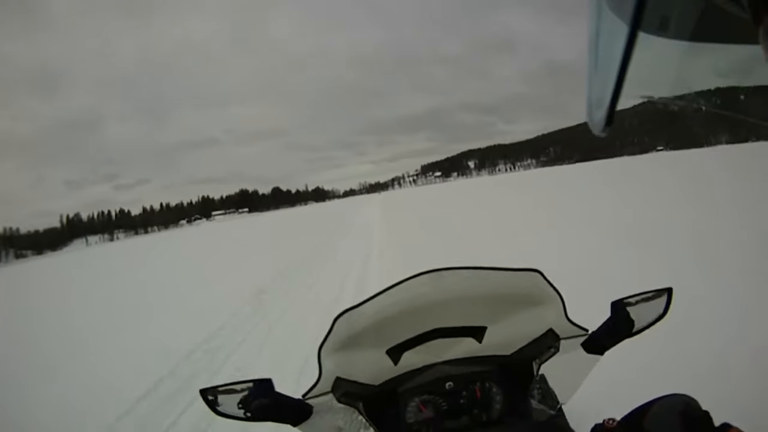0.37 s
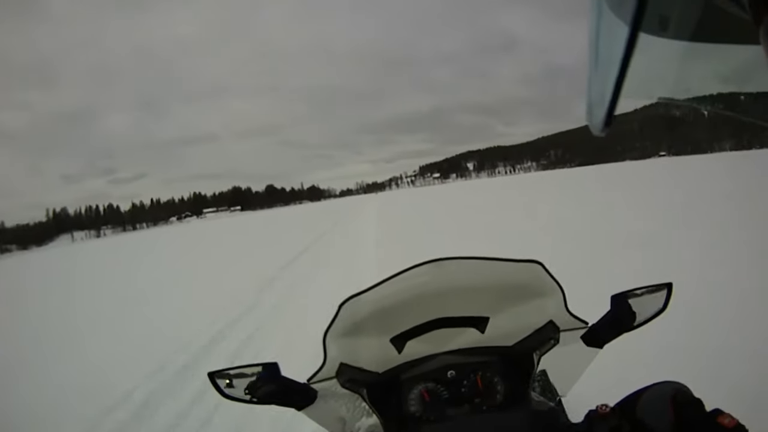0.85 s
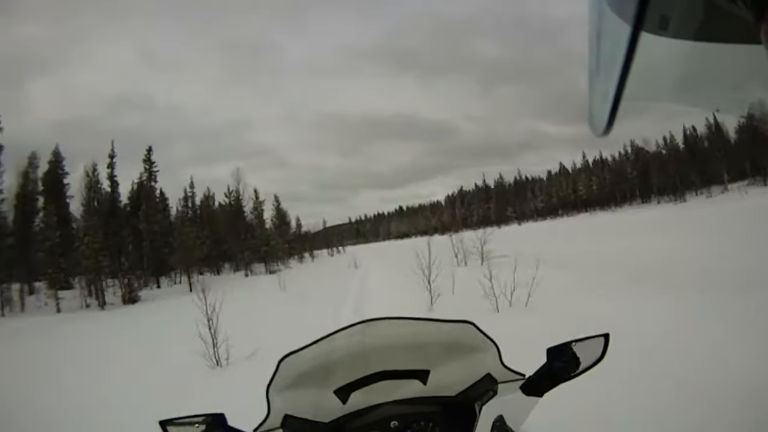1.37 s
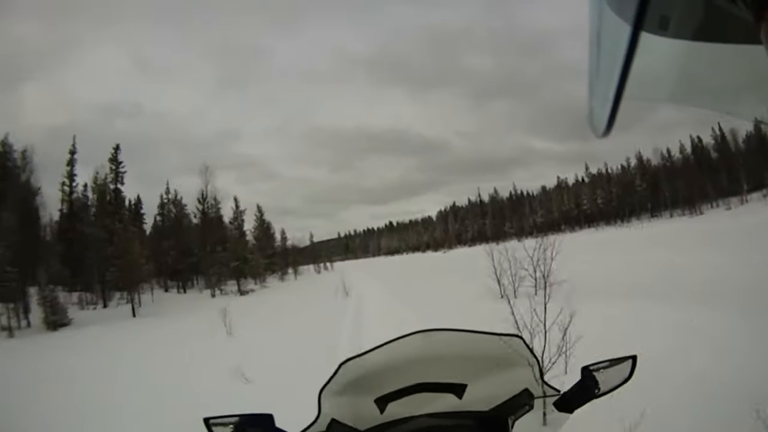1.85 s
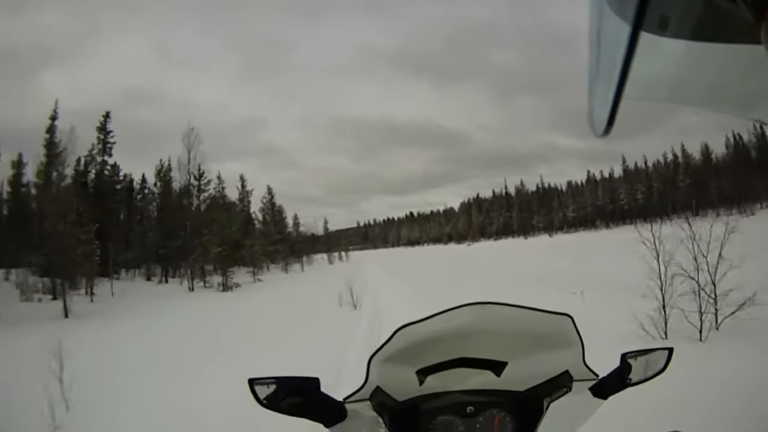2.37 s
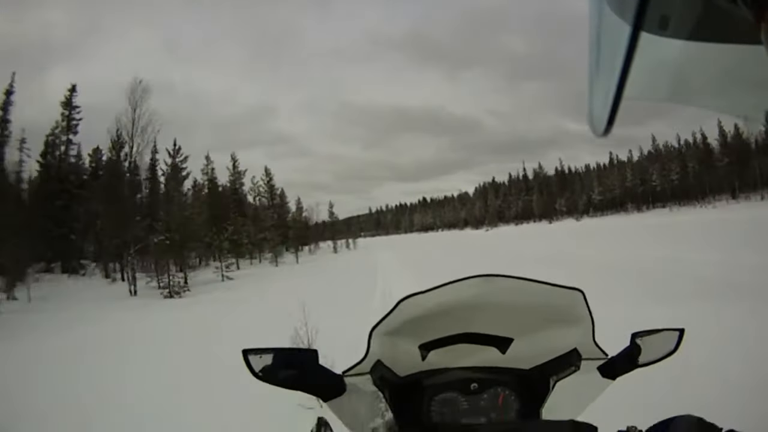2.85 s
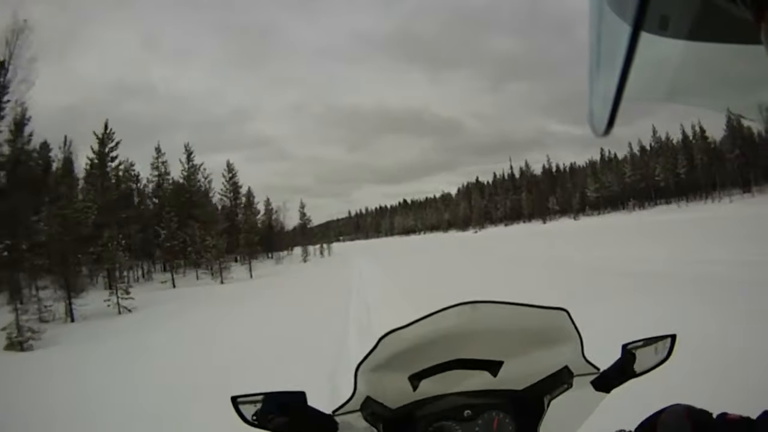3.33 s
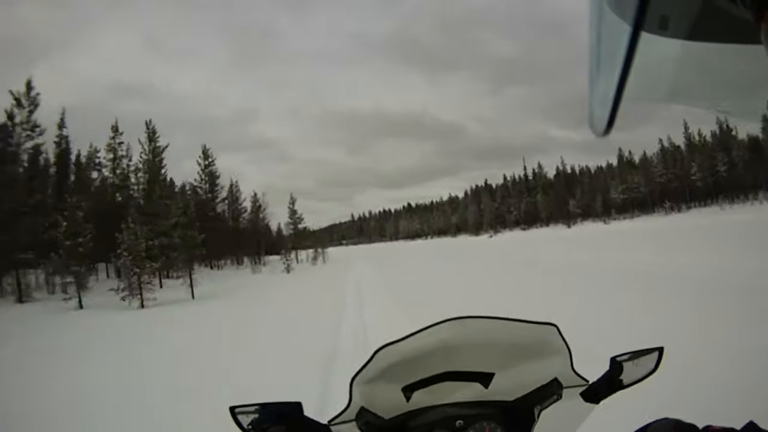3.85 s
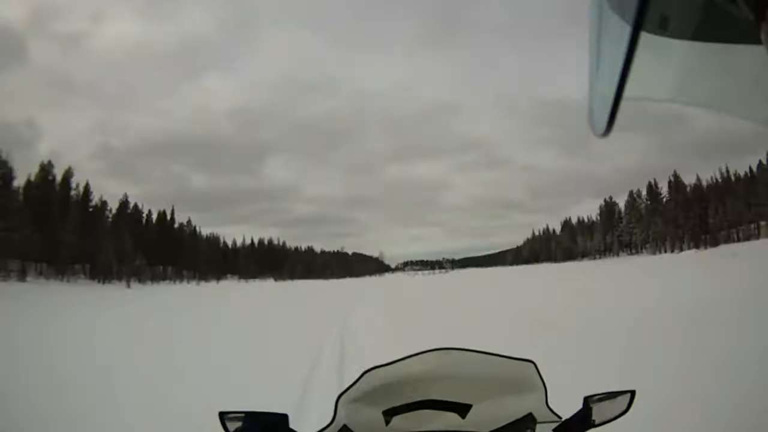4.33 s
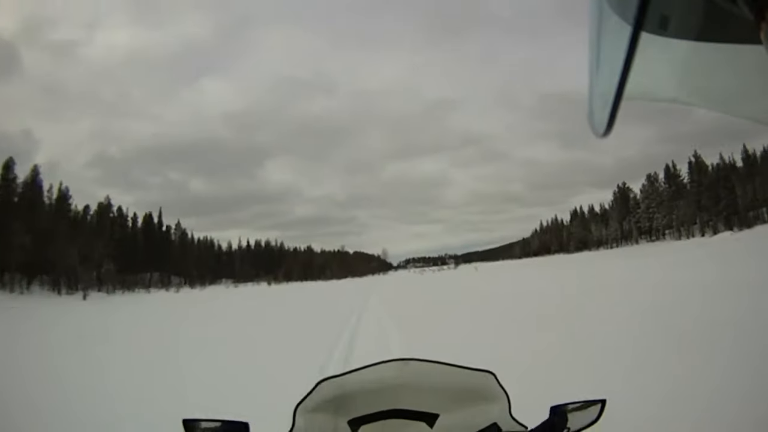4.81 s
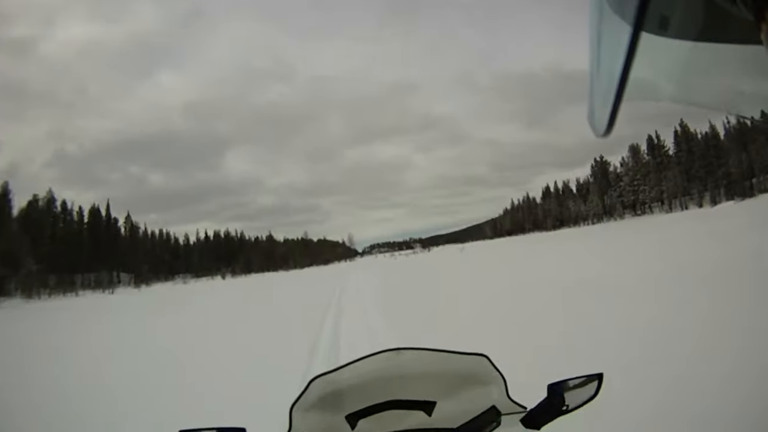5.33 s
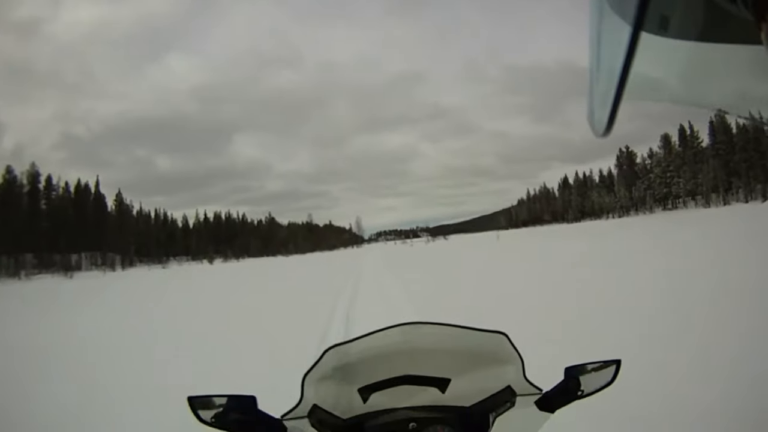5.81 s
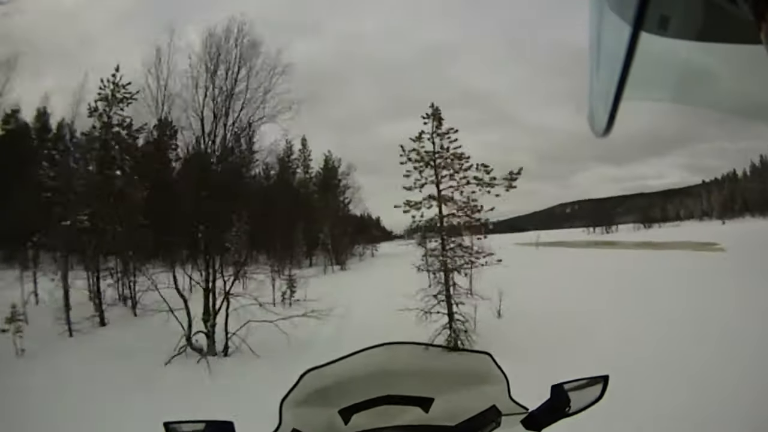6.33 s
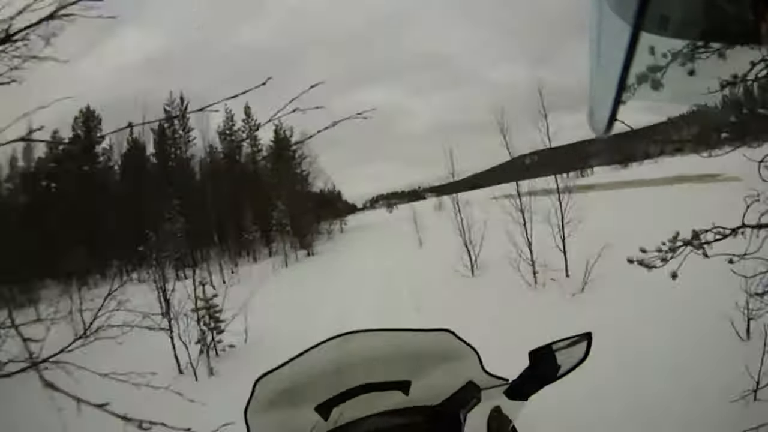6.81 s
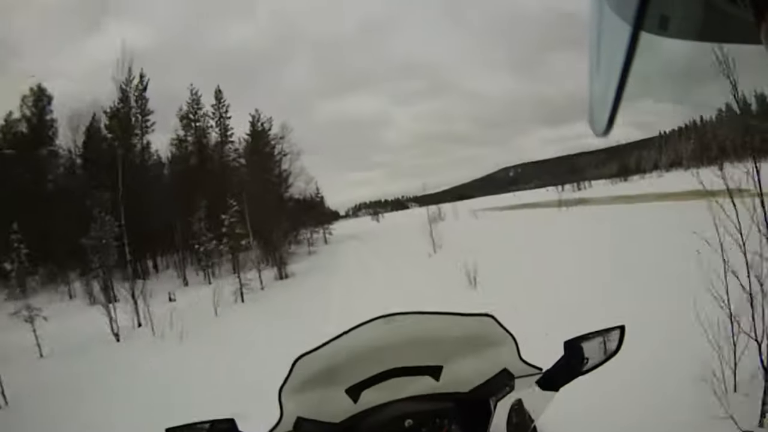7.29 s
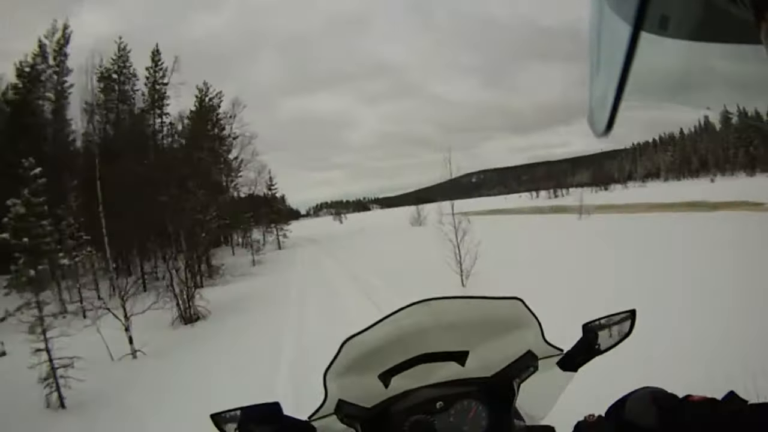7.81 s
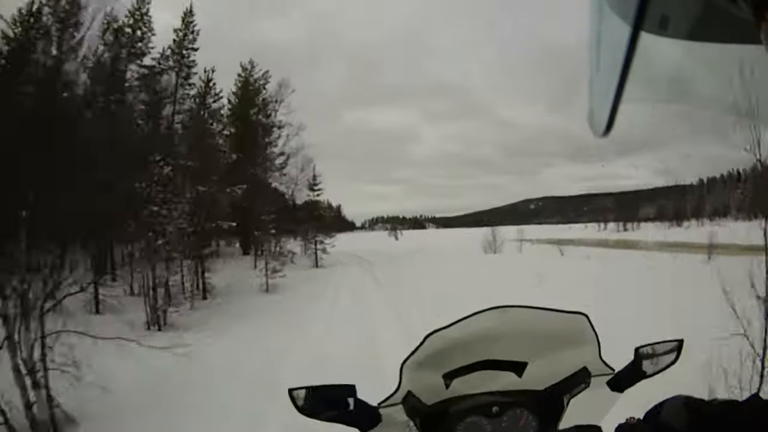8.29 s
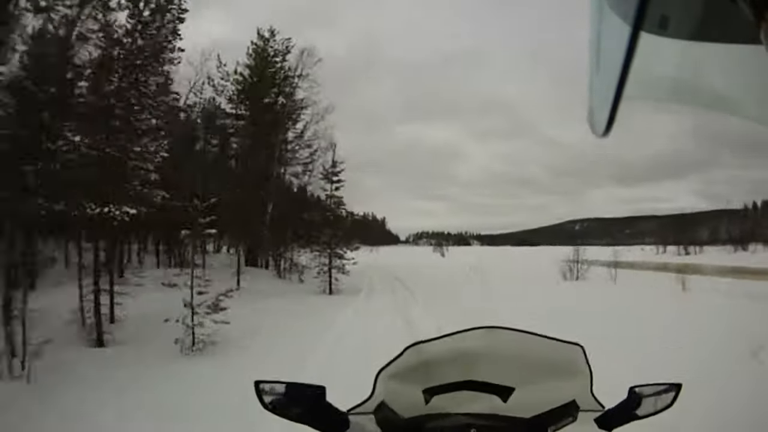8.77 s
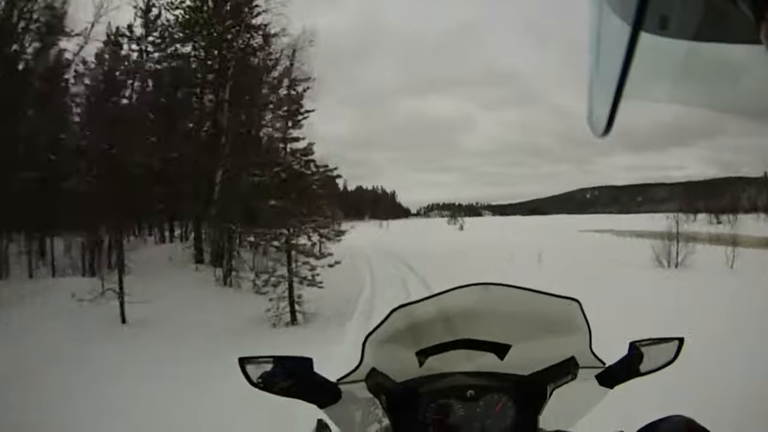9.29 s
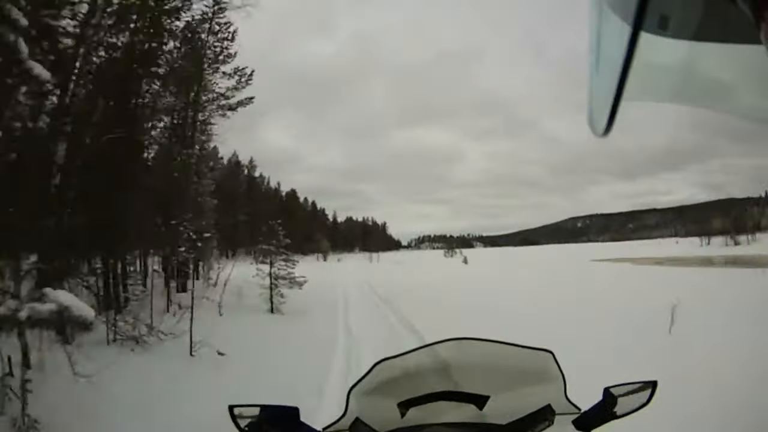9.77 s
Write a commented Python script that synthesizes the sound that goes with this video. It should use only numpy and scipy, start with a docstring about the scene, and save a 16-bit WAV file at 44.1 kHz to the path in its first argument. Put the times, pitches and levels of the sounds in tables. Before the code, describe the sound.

Outdoors on a fast snowmobile, heard from the rider's helmet, almost the same left and right. From 0 to 1.3 seconds a roaring, bright head wind overloads the microphone, crackling with ticks and chopped by millisecond stalls. At 1.34 a sharp click cuts to much quieter wind, baring an even dull engine and track roar and steady snow hiss. Irregular buffets thump and snap; the wind swells around 3 seconds and grows fuller from 3.9 to 5.9, with a thin wavering whine around 1300 hertz clearest near 3 to 4. A second click at 5.96 breaks into rougher, then weaker wind. A strong bright gust bursts at 7.0 to 7.3, then sinks, with deep thuds near 7.55 and 8.35 and a short gust around 8.2. From 8.7 moderate lumpy wind and buffets continue to 9.9, the whine returning faintly.

```python
"""Wind on a snowmobile rider's helmet

A microphone on the helmet hears three stretches of a fast ride, spliced together with a click at each joint.
Head wind is noise coloured by air speed, swelling in lumps, snaps and ticks, with sharp single buffets.
Brief stalls chop it, a few deep thuds rock the microphone, and the loudest moments overload it.
The machine is an even dull roar (noise) and a thin wavering drive whine (a sine), beside a steady hiss
of snow and smooth air (noise). Left and right sound almost alike, save for faint patches, mostly treble."""
import sys
import numpy as np
from scipy import signal
from scipy.fft import rfft, irfft, next_fast_len
from scipy.io import wavfile
from scipy.ndimage import uniform_filter1d

SR = 44100
rng = np.random.default_rng(int(sys.argv[2]) if len(sys.argv) > 2 else 0)


def store_wav(level_fs):
    """Save 16-bit WAV to argv[1]."""
    pcm = np.round(np.clip(np.atleast_2d(level_fs), -1, 1) * 32767)
    wavfile.write(sys.argv[1], SR, pcm.T.astype(np.int16))


def field_ratio(decibels):
    """Amplitude ratio for a level in dB (20 dB per decade); scalars and array-likes work."""
    return 10 ** (np.asarray(decibels, dtype=float) / 20)


N = 436590  # length [samples]

# Gusts, with a jump at each joint:
# (time [s], wind level [dB], 2-6 kHz share, which sets the air speed [dB])
WIND = [(0, -7.5, -13.5), (.7, -6.5, -11), (1.337, -7, -10.5), (1.342, -25.5, -24), (2.2, -23, -25),
        (2.8, -20, -21), (3.0, -16.5, -14), (3.149, -21, -23.5), (3.4, -18, -19.5), (3.496, -25, -22),
        (3.801, -23, -21), (3.87, -17, -21), (5.25, -17.5, -21), (5.32, -26.5, -14.5), (5.36, -17.5, -19),
        (5.962, -17, -19), (5.97, -35, -21), (6.05, -21, -17), (6.169, -20.5, -22), (6.189, -35.5, -29.5),
        (6.5, -26.5, -23.5), (6.978, -35, -20), (7.03, -17.5, -15), (7.14, -18.5, -18.5),
        (7.165, -15.5, -14), (7.25, -19.5, -15.5), (7.28, -24.5, -25), (7.33, -31, -27.5),
        (7.45, -32.5, -23), (7.62, -33, -24), (7.8, -27, -20.5), (8.02, -29, -24), (8.17, -19, -20.5),
        (8.209, -30, -27.5), (8.45, -30.5, -22.5), (8.701, -22, -25.5), (9.448, -20.5, -23),
        (9.9, -20, -23)]
# Relative pressure of the eddies at air speed 1: (frequency [Hz], level [dB per Hz])
EDDIES = [(100, 11), (300, 2), (600, -4.5), (1200, -11), (2400, -21), (4800, -36.5), (9600, -58),
          (20000, -84.5)]
# Bass that the microphone loses from wind: (frequency [Hz], gain [dB])
WIND_CUT = [(20, -47), (40, -26), (70, -20.5), (120, -13), (200, -7.5), (300, -3), (500, 0)]
# How broken the flow is: (time [s], share of the usual lumps and jolts [factor])
BROKEN = [(1.3, 1), (1.36, 0.9), (5.2, 0.95), (5.35, 0.75), (5.96, 0.75), (6.17, 0.65), (6.95, 0.8),
          (7.0, 0.4), (7.27, 0.4), (7.33, 0.8)]
# Relative colour of the engine and track roar: (frequency [Hz], level [dB per Hz])
ROAR = [(100, -13), (300, -1), (800, 7.5), (1400, 1.5), (2200, -6), (4000, -37.5), (8000, -73)]
# Relative colour of the hiss of snow and smooth air: (frequency [Hz], level [dB per Hz])
HISS = [(1000, -7.5), (2500, 2.5), (4000, -8), (6500, -14.5), (9000, -30.5), (12000, -48)]
# Hiss level before it swells with the wind: (time [s], level [dB])
HISS_LEVEL = [(0, -38), (2, -46.5), (5.9, -41.5), (6.2, -52.5), (8.6, -47.5), (9.9, -47.5)]
# Drive whine before it wavers: (time [s], pitch [Hz])
WHINE_PITCH = [(0, 1320), (3.4, 1335), (4, 1300), (5.9, 1300), (6.2, 1270), (7.5, 1268), (9, 1293),
               (9.9, 1300)]
# Drive whine before it wavers: (time [s], level [dB])
WHINE_LEVEL = [(0, -55), (2.3, -46), (3, -37), (4, -39), (7, -52), (9, -39), (9.9, -35.5)]
# Nominal strength of the faint patches that are opposite in left and right:
# (frequency [Hz], side over mid [dB])
SIDE_LEVEL = [(60, -49.5), (200, -45.5), (380, -39.5), (1290, -34.5), (2380, -25.5), (4400, -15.5),
              (8120, -7), (15000, -9.5)]
# Brief stalls that chop the wind: (time [s], length [s], depth [dB])
GAPS = [(0.021, 0.0083, -8), (0.091, 0.0027, -24.5), (0.126, 0.0073, -11.5), (0.164, 0.01, -7.5),
        (0.196, 0.0095, -9), (.23, 0.0067, -9.5), (0.243, 0.0072, -9.5), (0.53, 0.0061, -10.5),
        (0.568, .006, -9), (0.603, 0.0039, -13), (0.66, 0.0087, -6), (0.671, 0.0051, -19),
        (0.727, 0.0058, -13), (0.832, 0.0025, -7.5), (0.843, 0.0024, -12), (0.861, 0.0073, -16.5),
        (0.906, 0.01, -10), (0.948, 0.0079, -11), (1.006, 0.01, -10), (1.127, 0.0068, -15),
        (1.143, 0.0026, -9.5), (1.189, 0.009, -8.5), (1.232, 0.0033, -16), (2.985, 0.0098, -15),
        (5.915, 0.005, -9.5)]
# Strong single buffets, before overload:
# (time [s], peak level [dB], 2-6 kHz share, which sets the air speed [dB])
BUFFETS = [(0.062, 0, -2), (0.325, -12, 1), (0.514, 3, -9), (0.66, 12.5, -11.5), (0.744, 11.5, -18),
           (1.404, -6, -15), (1.429, -10, -10), (1.463, -11, -15), (1.482, -6, -18), (1.523, -15, -9),
           (1.537, -10, -23), (1.601, -14, -5), (1.613, -11, -18), (1.675, -5.5, -15.5), (1.723, -11, -22),
           (1.795, -5.5, -25), (1.834, -7.5, -46.5), (1.955, -5.5, -20), (2.025, -5, -18.5),
           (2.085, -4, -14), (2.252, -14.5, -9.5), (2.341, -6.5, -11), (2.364, -8, -19), (2.393, -5.5, -23),
           (2.428, -6.5, -13), (2.476, -2.5, -28.5), (2.738, -6.5, -18), (2.755, -9, -9), (2.837, -5, -6.5),
           (2.864, -5.5, -11.5), (2.876, -5, -5), (2.966, -1.5, -7.5), (3.018, -2.5, -9), (3.08, -11, -6),
           (3.322, -2, -16.5), (3.39, -6, -17), (3.432, -7, -8), (3.519, -12.5, -9), (3.6, -4.5, -20.5),
           (3.621, -4.5, -14), (3.683, -8, -30), (3.708, -2, -21), (3.765, -4, -22), (3.819, -11, -12),
           (3.847, -7, -16), (3.865, -10, -3), (3.886, -2.5, -10), (3.901, -11, -7), (3.919, -1.5, -16),
           (3.955, 0, -15), (3.985, -26, -3), (4.001, -12, -10), (4.031, -11, 1), (4.084, -4, -20.5),
           (4.133, -4, -7.5), (4.177, 3, -25), (4.197, -5.5, -33), (4.383, -5, -5), (4.649, 0, -23),
           (4.699, -9.5, -29), (5.002, 1.5, -22), (5.037, -11, -24), (5.157, -2.5, -12), (5.199, -4.5, -31),
           (5.23, -7, -8.5), (5.421, -3.5, -16), (5.529, -5, -42), (5.639, 2, -14.5), (5.727, -5, -25),
           (5.802, -4, -15), (5.835, -9, -19), (5.855, -5, -29), (5.866, -11, -11), (5.92, -7, -12),
           (5.944, -15, 1), (5.948, 1, -29), (5.956, -5, -7), (6.048, -7.5, -7.5), (6.081, -3, -8.5),
           (6.161, -7, -8), (6.238, -14, -15), (6.298, -12, -27), (6.329, -10, -12), (6.474, -7.5, -21),
           (6.517, -12, -32), (6.585, -11.5, -17), (6.633, -12, -20), (6.689, -13, -14), (6.725, -9.5, -19),
           (6.781, -7.5, -12.5), (6.789, -13.5, -22.5), (6.833, -17, -20), (7.084, -6, -6.5),
           (7.155, -6, -8), (7.239, -3.5, -15), (7.301, -7.5, -14), (7.442, -13, -36), (7.498, -5.5, -23),
           (7.506, -8.5, -22.5), (7.549, -8.5, -21), (7.581, -8.5, -16), (7.663, -8, -19), (7.673, -9, -20),
           (7.695, -12.5, -14), (7.736, -8.5, -26), (7.767, -12, -11), (7.807, -4, -15), (8.071, -7.5, -14),
           (8.162, -18, -15), (8.453, -9.5, -43.5), (8.505, -12.5, -21), (8.601, -3.5, -25),
           (8.696, -11.5, -6.5), (8.71, -10, -10.5), (8.761, -6, -12.5), (8.903, -6, -12),
           (9.085, -18, -24), (9.121, -9.5, -11), (9.167, -3.5, -41.5), (9.259, -10, -10),
           (9.353, -1.5, -10), (9.426, -4, -1), (9.464, -1, -27), (9.497, -4, -12.5), (9.532, -10, -9),
           (9.636, -10.5, -40), (9.744, -11, -2), (9.799, -3, -27)]
# Joints where the wave breaks off: (time [s], height of the step before overload [full scale = 1])
SPLICES = [(1.335, 0.61), (5.9621, 0.57)]
# Deep thuds of a few swings: (time [s], nominal peak level [dB], frequency [Hz])
THUDS = [(7.553, -14, 310), (7.59, -11.5, 180), (8.35, -16, 200)]


def evened(x):
    """Scales a signal to rms 1."""
    return x / np.sqrt(np.mean(x ** 2) + 1e-20)


def read(points, hz):
    """Reads a spectrum table on a log-frequency axis."""
    f, value = np.transpose(points)
    return np.interp(np.log(hz + 1), np.log(f + 1), value)


def wander(count, rate, lo_hz, hi_hz):
    """Random drift of rms 1, equally strong per octave from lo_hz to hi_hz."""
    hz = np.fft.rfftfreq(count, 1 / rate) + 1e-3
    shape = 1 / np.sqrt(hz * (1 + (lo_hz / hz) ** 4) * (1 + (hz / hi_hz) ** 4))
    return evened(irfft(rfft(rng.standard_normal(count)) * shape, count))


def shaped(x, gain, size=128):
    """Scales the short-time spectra of x, each bin by gain(Hz, s)."""
    hz, t, z = signal.stft(x, SR, nperseg=size, noverlap=size * 3 // 4)
    z = z * gain(hz[:, None], t)
    return signal.istft(z, SR, nperseg=size, noverlap=size * 3 // 4)[1][:N]


def causal(gain):
    """Adds the phase that makes a colour ring after its cause, never before."""
    fold = irfft(np.log(gain + 1e-9))
    fold[1:len(gain) - 1] *= 2
    fold[len(gain):] = 0
    return np.exp(rfft(fold))


def speed_of(share_db, calm_db=-18, db_per_octave=11):
    """Air speed as a factor: faster air sweeps the eddies by quicker and so brightens them."""
    return 2 ** ((share_db - calm_db) / db_per_octave)


def wind(hits, lump_db=5.0, snap_db=6.0, faster=0.075, snappier=0.12, cap=2.6, full_db=-8, dense=1.8,
         tick_db=-12, ticks_per_s=90, tick_speed=4.0, duller=0.047, harder=0.25):
    """Eddies swept past the microphone port: the faster the air, the higher the whole spectrum sits."""
    s, db, share_db = np.transpose(WIND)
    room = next_fast_len(N + SR)  # spare length, so that filter tails do not wrap round
    t, all_hz = np.arange(N) / SR, np.fft.rfftfreq(room, 1 / SR)
    level = field_ratio(np.interp(t, s, db))
    mean_speed = speed_of(np.interp(t, s, share_db))

    # eddies arrive as slower lumps and as separate quick jolts
    uneven = np.interp(t, *np.transpose(BROKEN))
    lumps = uneven * cap * np.tanh(wander(N, SR, lo_hz=17.0, hi_hz=121) / cap)
    snaps = uneven * cap * np.tanh(wander(N, SR, lo_hz=64.0, hi_hz=534) / cap)
    # a full, fast blast runs evener than a breeze
    broken = 1 / (1 + (level * mean_speed ** dense / field_ratio(full_db)) ** 2)

    stall_db = gaps_db()
    flow = level * field_ratio(stall_db) * lulls(hits) * evened(field_ratio(lump_db * broken * lumps))
    # strong air is fast, stalled air is dull
    speed = mean_speed * np.exp(broken * (faster * lumps + snappier * snaps) + duller * stall_db)
    drive = flow * evened(field_ratio(snap_db * snaps) * rng.standard_normal(N))

    def colour(hz, frame_s):
        """Eddy spectrum moved by air speed, with even power once the wind cut is applied."""
        frame_speed = np.clip(np.interp(frame_s, t, speed), 0.3, 5)
        eddies = field_ratio(read(EDDIES, hz / frame_speed))
        return eddies / np.sqrt(np.mean((eddies * field_ratio(read(WIND_CUT, hz))) ** 2, 0))

    # tiny fast eddies break as thin ticks, more of them in quick air and in a full blast
    happens = rng.random(N) < ticks_per_s * speed ** 2 / broken / SR
    sparse = uneven ** 2 * rng.laplace(0, 1, N) * happens
    tick_drive = flow * speed * level ** harder * sparse
    tick_colour = field_ratio(read(EDDIES, all_hz / tick_speed))
    ticks = evened(irfft(rfft(tick_drive, room) * tick_colour, room)[:N])

    pressure = shaped(drive, colour) + field_ratio(tick_db) * np.std(flow) * ticks
    return irfft(rfft(pressure, room) * field_ratio(read(WIND_CUT, all_hz)), room)[:N]


def even_noise(table, level_db, throb_db, follow):
    """A throbbing noise of the given colour that swells slowly with the wind."""
    s, db, _ = np.transpose(WIND)
    swell_db = follow * uniform_filter1d(np.interp(np.arange(N) / SR, s, db), size=4000)
    noise = rng.standard_normal(N) * field_ratio(throb_db * wander(N, SR, lo_hz=6.2, hi_hz=60))
    colour = field_ratio(read(table, np.fft.rfftfreq(N, 1 / SR)))
    return field_ratio(level_db + swell_db) * evened(irfft(rfft(noise) * colour, N))


def roar():
    """Engine and track blend into one dull noise."""
    return even_noise(ROAR, level_db=-25, throb_db=4.0, follow=0.24)


def hiss():
    """Snow and the smooth airstream make a steady, brighter noise."""
    level_db = np.interp(np.arange(N) / SR, *np.transpose(HISS_LEVEL))
    return even_noise(HISS, level_db, throb_db=1.5, follow=0.19)


def whine(waver_hz=10, waver_db=4.5):
    """A tooth-mesh tone of the drive that wavers a little in pitch and strength."""
    t = np.arange(N) / SR
    pitch = np.interp(t, *np.transpose(WHINE_PITCH)) + waver_hz * wander(N, SR, lo_hz=6.2, hi_hz=30)
    level_db = np.interp(t, *np.transpose(WHINE_LEVEL)) + waver_db * wander(N, SR, lo_hz=0.73, hi_hz=14)
    return np.sqrt(2) * field_ratio(level_db) * np.sin(2 * np.pi * np.cumsum(pitch) / SR)


def side_patches(hz, s, threshold=0.45):
    """Gain of the side signal: random phase in patches of a few frames and bands, zero elsewhere."""
    rows, columns = len(s) // 4 + 1, len(hz) // 32 + 1
    patches = rng.random((rows, 1)) / 2 + rng.random((rows, columns)) / 2
    filled = np.repeat(np.repeat(patches < threshold, 4, 0), 32, 1)[:len(s), :len(hz)]
    phase = np.exp(2j * np.pi * rng.random(filled.shape))
    return (filled * phase).T * field_ratio(read(SIDE_LEVEL, hz))


def gaps_db():
    """The air at the port stalls for a few milliseconds: a smooth dip in dB."""
    out, u = np.zeros(N), np.arange(-1200, 1200) / SR
    for s, length, depth_db in GAPS:
        at = np.clip(round(s * SR) + np.arange(-1200, 1200), 0, N - 1)
        out[at] += depth_db * np.exp(-(2 * u / length) ** 4 / 2)
    return out


def lulls(hits, depth=1.0, before_s=0.01, after_s=0.007, again=0.15, width_s=0.0019):
    """The air sags for a moment before each buffet and again as it ends."""
    marks, at = np.zeros(N + SR), hits[:, 0]
    marks[np.round((at - before_s) * SR).astype(int)] = 1
    marks[np.round((at + after_s) * SR).astype(int)] = again
    dip = np.exp(-(np.arange(-800, 801) / SR / width_s) ** 2)
    return 1 - np.clip(depth * signal.oaconvolve(marks, dip, "same")[:N], 0, 0.95)


def buffets(hits, usual_db=-17, low_hz=120, rise_s=0.0032, fall_s=0.0049, lead_s=0.002106,
            linger=0.13, spike=11, top_hz=7000):
    """A spike in a short burst of noise, coloured by its own air speed; slow buffets linger."""
    out, u = np.zeros(N + 2048), np.arange(-600, 1448) / SR
    hz = np.fft.rfftfreq(2048, 1 / SR)
    noises = rng.standard_normal((len(hits), 2048))
    for (s, peak_db, share_db), noise in zip(hits, noises):
        speed = speed_of(share_db, usual_db)
        rise, fall = np.exp(-(u / rise_s) ** 2), np.exp(-(u * speed ** linger / fall_s) ** 2)
        spiked = (noise + spike * np.sign(noise) * (u == 0)) * np.where(u < 0, rise, fall)
        colour = field_ratio(read(EDDIES, hz / speed) + read(WIND_CUT, hz))
        colour = colour * hz / (hz + low_hz) / (1 + (hz / top_hz) ** 2)  # no deep bass, soft top
        burst = irfft(rfft(spiked) * causal(colour))
        at = round((s + lead_s) * SR) - 600
        out[at:at + 2048] += field_ratio(peak_db) * burst / abs(burst).max()
    return out[:N]


def splices(rise_s=0.00056):
    """A swing of pressure that stops dead at each joint: a click."""
    t = np.arange(N) / SR
    return sum(step * (t < s) * np.exp(np.minimum(t - s, 0) / rise_s) for s, step in SPLICES)


def thuds(turns=1.05):
    """A large slow eddy rocks the microphone for two or three swings."""
    t, out = np.arange(N) / SR, np.zeros(N)
    for s, db, hz in THUDS:
        envelope = np.exp(-((t - s) * hz / turns) ** 2)
        out += field_ratio(db) * envelope * np.sin(2 * np.pi * (hz * t + rng.random()))
    return out


def scene():
    """One microphone feeds both channels."""
    hits = np.array(BUFFETS)
    air = wind(hits) + buffets(hits) + thuds()
    machine = roar() + hiss() + whine()
    return np.tile(air + machine + splices(), (2, 1))


def band_limit(x):
    """A steep low-pass at the top of the band."""
    return signal.sosfilt(signal.butter(12, 15700, fs=SR, output="sos"), x)


def record(dry, knee=1.35):
    """Loud buffets squash and clip; a faint patchy side signal is added left and subtracted right."""
    mid = np.clip(knee * np.tanh(dry[0] / knee), -1, 1)
    side = 2 * shaped(mid, side_patches, size=1024)
    return band_limit(np.array([mid + side, mid - side]))


dry = scene()
out = record(dry)
store_wav(out)
```